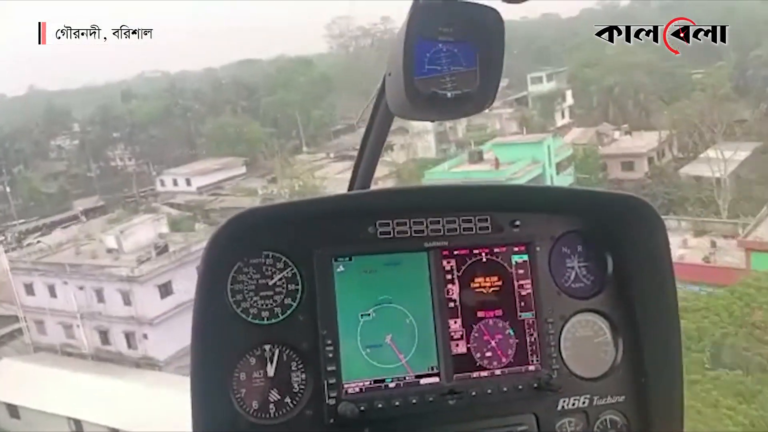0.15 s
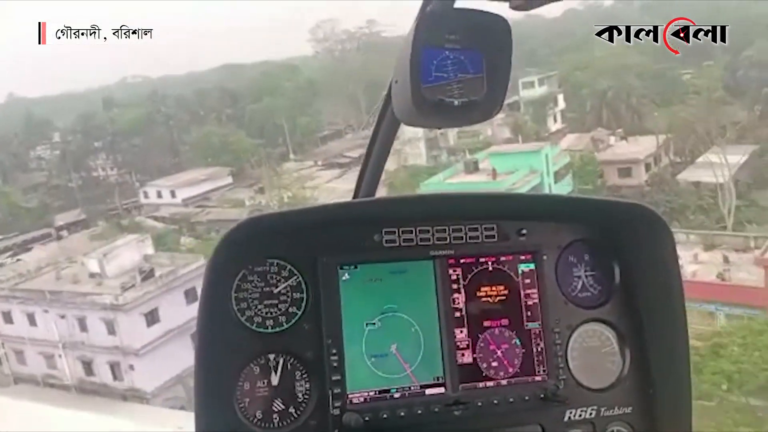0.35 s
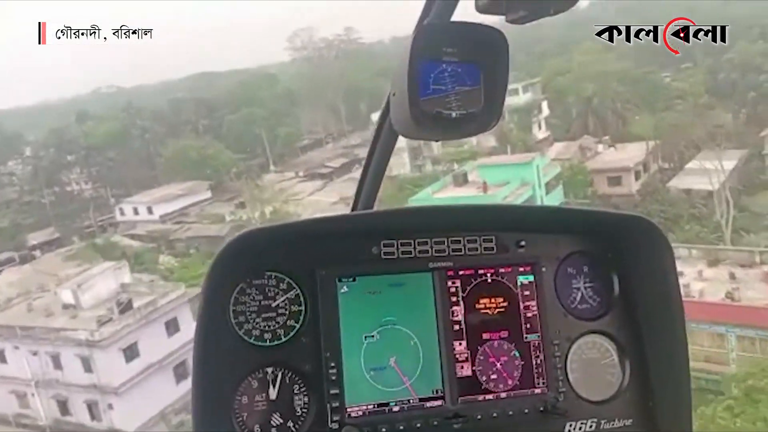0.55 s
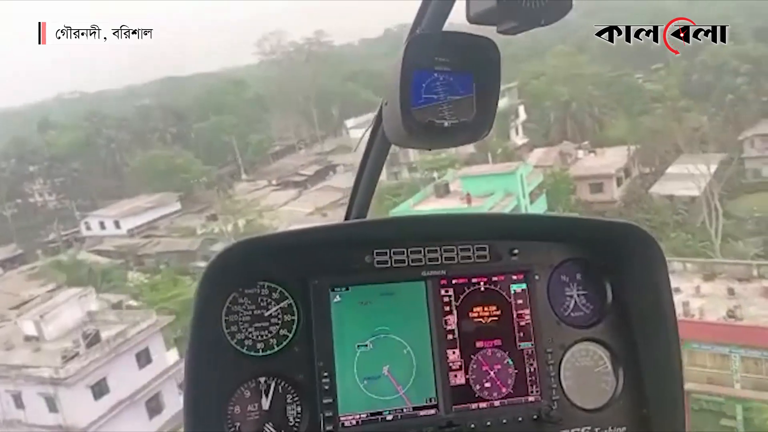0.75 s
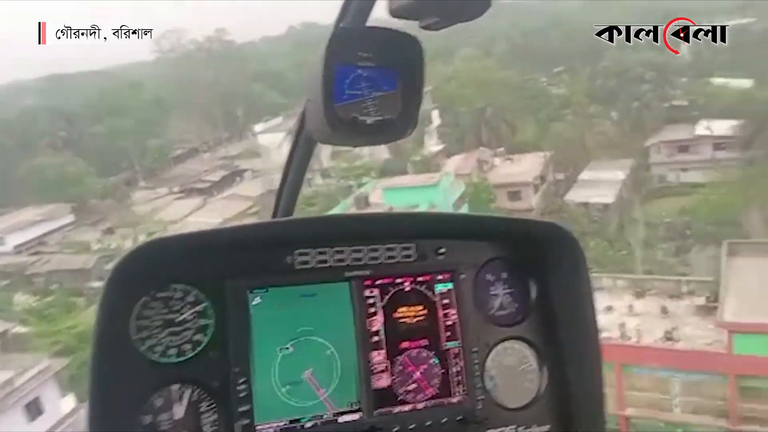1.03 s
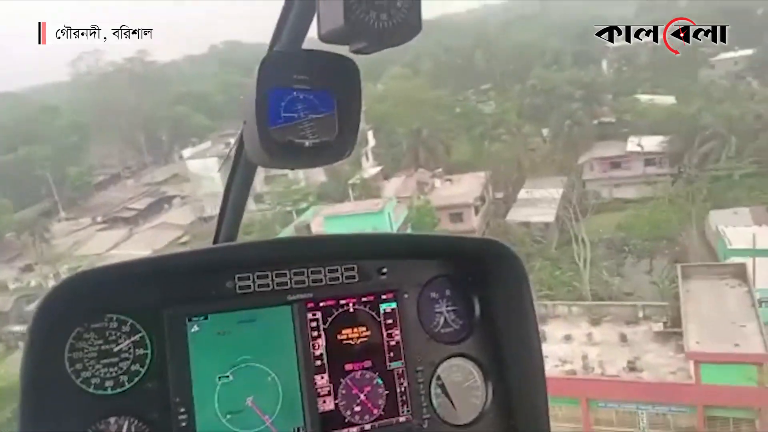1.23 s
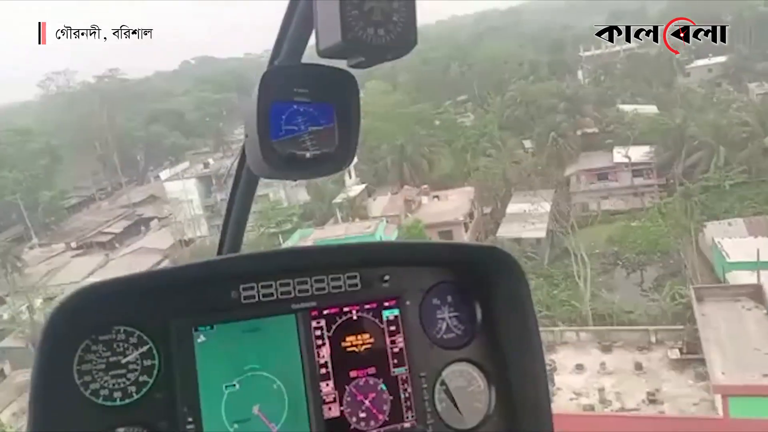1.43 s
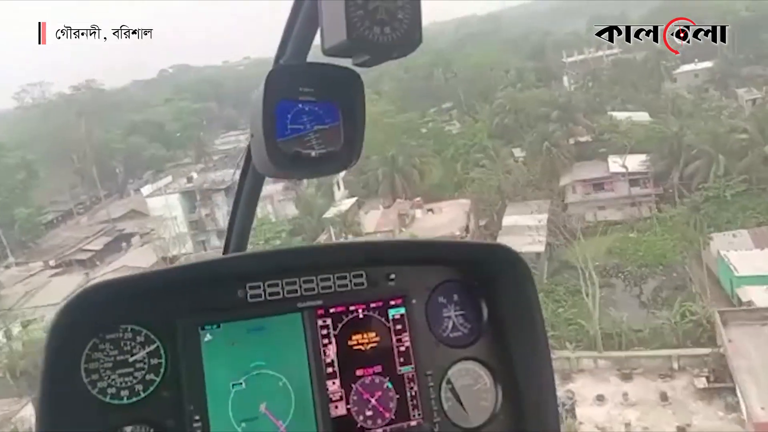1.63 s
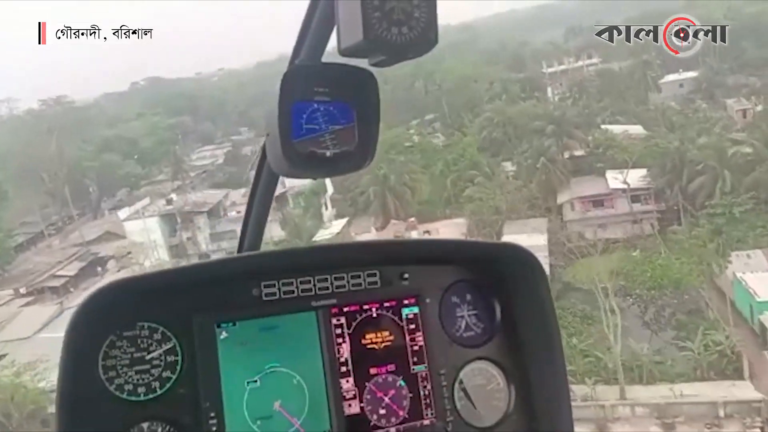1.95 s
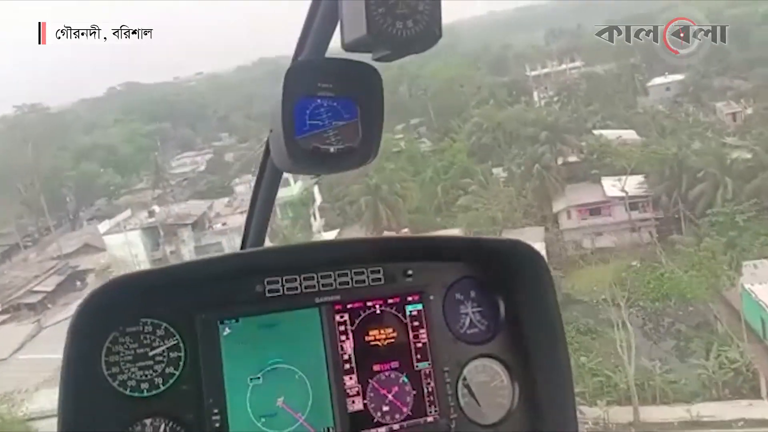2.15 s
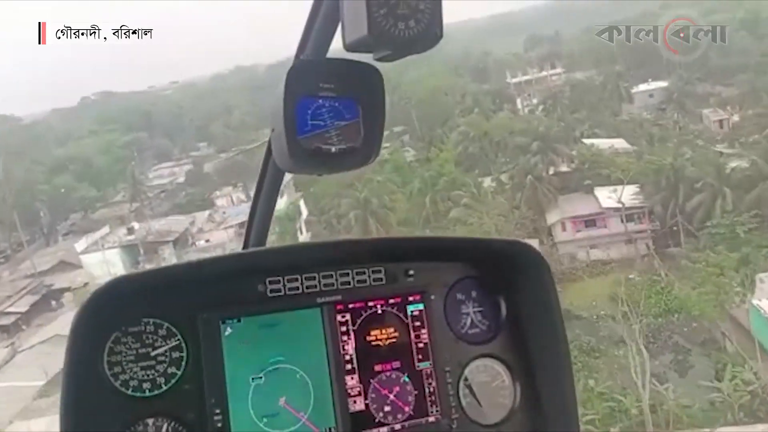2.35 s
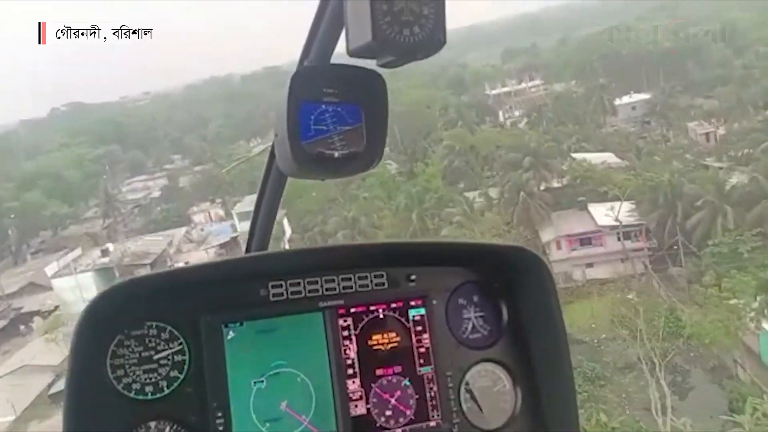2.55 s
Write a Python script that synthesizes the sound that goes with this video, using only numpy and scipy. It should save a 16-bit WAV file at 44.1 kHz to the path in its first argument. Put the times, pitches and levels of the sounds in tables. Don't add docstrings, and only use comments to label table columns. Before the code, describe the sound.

Helicopter cabin in flight: loud low roar, booming bass, fast regular blade thumps, thin high whines

```python
import sys
import numpy as np
from scipy import signal
from scipy.fft import rfft, irfft, next_fast_len
from scipy.io import wavfile
from scipy.ndimage import uniform_filter1d, minimum_filter1d

SR = 44100
rng = np.random.default_rng(int(sys.argv[2]) if len(sys.argv) > 2 else 0)


def ratio_of_db(decibels):
    return 10 ** (np.asarray(decibels, float) / 20)


def put_to_file(sound):
    columns = np.atleast_2d(sound).T
    safe = np.clip(columns, -1, 1)
    whole_steps = np.round(safe * 32767)
    wavfile.write(sys.argv[1], SR, whole_steps.astype(np.int16))


N = 119070
TIME = np.arange(N) / SR
BLADE_HZ = 13.66
BASS_PAN_DB = -1

# (time [s], wind roar level [dB], tail-rotor overtone level [dB])
AIRSPEED = [
    (0, -1.5, 0),
    (.25, 0, 0.5),
    (.5, 0.5, 2.5),
    (1.0, 0, -0.5),
    (1.6, -2, -1),
    (2.1, -1, -5),
    (2.7, -3.5, -16),
]
# (pitch [Hz], left level [dB], right level [dB], phase lead of left [rad])
TAIL_ROTOR = [(161.4, -36, -35, 0), (242, -45, -41.5, .4), (322.8, -47, -46.5, -.6), (403.4, -53, -50, .4),
              (807.3, -55, -47, 2.4), (1615, -69, -58, -.7)]


def walk(rate):
    hold = 16
    steps = np.repeat(rng.standard_normal(int(N / SR * rate) + 2), hold)
    smooth = 1.184 * uniform_filter1d(uniform_filter1d(steps, hold), hold)
    return np.interp(TIME * rate * hold, np.arange(len(smooth)), smooth)


def curve(table, col=1):
    points = np.array(table)
    return np.interp(TIME, points[:, 0], points[:, col])


def shape(table, hz):
    points = np.array(table)
    return np.interp(np.log(hz), np.log(points[:, 0]), points[:, 1])


def tone(row, turns, db=0, wander_db=0.7, flutter_db=0):
    hz, left_db, right_db, lead = row
    jitter = np.cumsum(0.00039 * walk(9.54)) / SR
    phase = 2 * np.pi * (hz * (turns + jitter) + rng.random())
    both = db + wander_db * walk(5.7)
    if flutter_db:
        both = both + flutter_db * walk(16)
    left = ratio_of_db(left_db + both + 0.39 * walk(3.2)) * np.sin(phase + lead)
    right = ratio_of_db(right_db + both) * np.sin(phase)
    return np.sqrt(2) * np.array([left, right])


def rotor_turns():
    # (time [s], speed above nominal [percent])
    speed = [
        (0, 0.1136),
        (.95, .14),
        (1.65, -0.0994),
        (2.05, -0.192),
        (2.7, -0.24),
    ]
    return np.cumsum(1 + curve(speed) / 100) / SR


def roar(beats):
    # (pitch [Hz], width [Hz], level [dB])
    cabin = [(147.5, 38, 7), (204.5, 15, 14), (341.6, 24, 1.5), (406, 45, 3), (484.5, 48, 10.5),
             (560, 32, 0.5), (825, 32, 2)]
    # (pitch [Hz], level [dB per Hz])
    bass = [(12, -76.5), (22, -67), (32, -55.5), (60, -59), (85, -63), (130, -59.5), (230, -61.5),
            (450, -69)]
    left = [(620, -74), (950, -78.5), (1400, -80.5), (2000, -83.5), (3000, -93), (5000, -95), (5800, -104),
            (6700, -122)]
    left_top = [(7600, -112), (9000, -102), (10000, -100), (11200, -108), (12200, -103.5), (12900, -113.5),
                (13400, -122), (15500, -120)]
    right = [(620, -71.5), (950, -76.5), (1350, -73.5), (2000, -83.5), (3200, -95), (4400, -88),
             (5200, -89), (6100, -102)]
    right_top = [(7800, -109), (8800, -115), (9700, -128), (11400, -128), (12200, -114), (13500, -118),
                 (15000, -117), (15600, -125)]
    # (pitch [Hz], likeness of the two ports [0-1])
    alike = [(20, 0.97), (190, 0.98), (320, 0.5), (500, 0.92), (650, 0.4), (1000, 0.1), (2000, 0)]
    # (pitch [Hz], lift [dB])
    swish_lift = [(30, 4), (150, 0.5), (500, 3), (1500, 3.5), (3000, 2.5), (6000, 6), (10000, 7)]
    # (time [s], level [dB])
    buffeting = [
        (0, -8),
        (.8, -7),
        (1.5, -5),
        (2.0, -5.5),
        (2.12, 7),
        (2.32, 7),
        (2.45, -5),
        (2.7, 1),
    ]
    size = next_fast_len(N)
    hz = np.fft.rfftfreq(size, 1 / SR) + 1

    t = np.arange(SR // 8) / SR
    puff = (1 - np.exp(-t / .004)) * np.exp(-t / .019) * 2
    swish = signal.fftconvolve(beats, puff)[:N]

    rings = 1 + sum(ratio_of_db(2 * db) / (1 + ((hz - f) / (w / 2)) ** 4) for f, w, db in cabin)
    left_gain = ratio_of_db(shape(bass + left + left_top, hz) + BASS_PAN_DB * (hz < 520))
    right_gain = ratio_of_db(shape(bass + right + right_top, hz))
    gain = np.array([left_gain, right_gain])

    like = np.clip(shape(alike, hz), 0, 1)
    mid, side = rfft(rng.standard_normal((2, size)))
    air = np.sqrt(1 + like) * mid + np.sqrt(1 - like) * side * np.array([[1], [-1]])
    air = air * gain * np.sqrt(rings * SR / 4)

    swell, buffet, wind = walk(0.65), curve(buffeting), curve(AIRSPEED)
    lowest_hz = 16
    place = 2 * np.log2(hz / lowest_hz)
    out = 0
    for k in range(21):
        mid_hz = lowest_hz * 2 ** (k / 2)
        flicker = 1.5 * walk(8.93) * (mid_hz > 240)
        db = 0.7348 * swell + flicker + shape(swish_lift, mid_hz) * swish
        db = db + buffet / (1 + (mid_hz / 106) ** 4)
        db = db + wind / (1 + (230 / mid_hz) ** 4)
        band = np.clip(1 - abs(place - k), 0, 1)
        out = out + ratio_of_db(db) * irfft(air * band, size)[:, :N]
    return out


def tail_rotor_overtones(turns):
    pitch_db = curve(AIRSPEED, col=2)
    return sum(tone(row, turns, pitch_db) for row in TAIL_ROTOR[1:])


def drive_train(turns):
    # (pitch [Hz], left level [dB], right level [dB], phase lead of left [rad])
    gears = [(552.5, -47, -48, -.1), (587, -53, -55, .2), (771.5, -59, -57, .5), (855, -57, -54, .6),
             (1098, -59, -55, 1.2), (1158, -72, -58, .5), (1227, -69, -54, .4), (1297, -58, -46, -1.8),
             (1367, -62, -54, .5), (1498, -54, -59, -2.3), (1690, -63, -59, -1.5), (1733, -61, -58, 2.4),
             (1993, -63, -66, -.2), (2331, -72, -77, 1.1)]
    return sum(tone(row, turns) for row in gears)


def turbine(turns):
    # (pitch [Hz], left level [dB], right level [dB], phase lead of left [rad])
    wheels = [(2595, -60, -63, .2), (2762, -75, -76, 1.4), (2998, -76, -82, 1), (3316, -73, -79, 2.6),
              (3467, -77, -82, 1), (3833, -76, -72, -1.2), (3905, -78, -73, -1), (4156, -84, -71, -1.5),
              (4791, -86, -74, .6), (5190, -82, -68, -.7), (5518, -80, -69, .8), (8296, -89, -93, 1.8),
              (9399, -82, -110, 0), (13781, -91, -84, 1.2)]
    return sum(tone(row, turns) for row in wheels)


def whines(turns):
    # (pitch [Hz], left level [dB], right level [dB], phase lead of left [rad])
    pitches = [(3867, -65.5, -58.5, -1.1), (4416, -65, -52, -1.7), (4990, -62.5, -50.5, 1.5),
               (12115, -75, -89, .3)]
    # (time [s], low whine level [dB], middle level [dB], high level [dB], top level [dB])
    standing_waves = [(0, 5, 1, 7, -4), (.15, 4, 3, 6.5, -4), (.33, 5, 6, 7, -3), (.55, 5, 3, 6, -4),
                      (.68, 5, -5, 6, -5), (.76, 5, -20, 5, -4), (.83, 6, -17, 4, -3), (.91, 5, -3, 2, -2),
                      (.98, 3, 2, -13, -2), (1.1, 1, 2, -3, 0), (1.35, 0, 1, -6, 3), (1.6, 0, 2, -9, 2),
                      (1.8, 1, 2, -11, 2), (2.0, 2, 4, -11, 1), (2.2, 1, 3, -10, -1), (2.38, 1, 3, -16, -4),
                      (2.5, 1, 0, -7, -5), (2.7, 2, 1, -8, -6)]
    out = 0
    for k, row in enumerate(pitches):
        out = out + tone(row, turns, curve(standing_waves, col=k + 1), wander_db=0.92, flutter_db=1.0)
    return out


def booms(turns):
    # (time [s], peak level [dB], pitch [Hz])
    puffs = [(0.019, -19.5, 177), (0.042, -24.5, 165), (0.076, -17.0, 174.5), (0.123, -18, 171.5),
             (0.219, -22, 173.3), (0.247, -24, 160), (0.301, -17, 178), (0.326, -18, 175.4),
             (0.394, -19, 179), (0.435, -20.5, 164), (0.461, -17.5, 171.4), (0.537, -19, 179),
             (0.583, -20, 179), (0.633, -17.5, 178), (0.655, -19, 191), (0.679, -17, 175),
             (0.715, -20, 171), (0.763, -15, 164.7), (0.849, -22.5, 194.3), (0.874, -22.5, 175),
             (0.896, -29, 193), (0.928, -21.5, 166), (0.952, -19, 171), (0.979, -21, 167),
             (1.032, -21.0, 179), (1.07, -14, 167), (1.099, -17.5, 166), (1.144, -17.5, 166),
             (1.214, -21.0, 193), (1.286, -16.0, 170.2), (1.334, -16.5, 173), (1.359, -23, 185),
             (1.381, -22, 164), (1.406, -17, 166), (1.433, -17, 171.6), (1.487, -18, 169),
             (1.535, -28, 154), (1.58, -17.5, 168.6), (1.625, -18.5, 173), (1.648, -15.5, 173),
             (1.814, -17.5, 167.3), (1.86, -16, 167.5), (1.933, -19, 155), (1.974, -19, 164),
             (2.039, -15, 180.2), (2.066, -14.5, 168.3), (2.162, -24, 161), (2.19, -14.5, 155),
             (2.234, -17, 157), (2.319, -17.5, 170.4), (2.381, -22, 176), (2.403, -20.5, 175),
             (2.425, -20.5, 174), (2.476, -15.5, 160), (2.518, -17.5, 175.6), (2.546, -19, 175),
             (2.582, -16.5, 164), (2.622, -27, 166), (2.662, -21, 169), (2.693, -26.5, 165)]
    hum_hz = TAIL_ROTOR[0][0]
    out = ratio_of_db(-32) * np.sin(2 * np.pi * hum_hz * turns)
    at = np.array(puffs)[:, 0]
    gaps = np.minimum(np.diff(at, prepend=-1, append=9), .1)
    slip = 0.51 * rng.standard_normal(len(at))
    for k, (s, db, hz) in enumerate(puffs):
        before, after = gaps[k], gaps[k + 1]
        near = slice(max(int((s - before) * SR) + 1, 0), int((s + after) * SR))
        lag = TIME[near] - s
        span = np.where(lag < 0, before, after)
        swell = abs(np.cos(np.pi / 2 * lag / span)) ** 3.6
        start = 2 * np.pi * hum_hz * turns[min(int(s * SR), N - 1)] + slip[k]
        out[near] += ratio_of_db(db) * swell * np.sin(2 * np.pi * hz * lag + start)
    pan_db = -0.9
    return ratio_of_db(-2.73) * out * ratio_of_db(np.array([[pan_db / 2], [-pan_db / 2]]))


def blades():
    # (time [s], blade load [dB])
    load = [
        (0, -11),
        (.8, -9),
        (1.0, -7),
        (1.5, -6),
        (1.85, -6),
        (2.05, -2),
        (2.3, 1),
        (2.45, -1),
        (2.7, 0),
    ]
    # (time [s], extra level [dB])
    slaps = [(.17, 3), (.32, 5), (.69, 3), (.9, 5), (.99, 3), (1.13, 2), (1.21, 4), (1.36, 2), (1.5, 2),
             (1.94, 5), (2.01, 4), (2.09, -5), (2.16, 0), (2.31, 0), (2.38, 3), (2.45, -1), (2.53, 4),
             (2.6, -2), (2.67, 4)]
    k = np.arange(int(N / SR * BLADE_HZ) + 1)
    at = ((.035 + k / BLADE_HZ) * SR).astype(int)
    db = curve(load)[at] + 1.0 * rng.standard_normal(len(k))
    for s, extra_db in slaps:
        db[np.argmin(abs(at - s * SR))] += extra_db
    beats = np.zeros(N)
    beats[at] = ratio_of_db(db)
    return beats


def thump(beats):
    shell_hz, width_hz = 33, 28
    hz = np.fft.rfftfreq(N, 1 / SR) + 1e-3
    resonance = 1 / (1 + 1j * (hz - shell_hz ** 2 / hz) / width_hz) ** 2
    ring = irfft(rfft(beats ** .7) * resonance, N)
    ring = ring * SR / np.sqrt(BLADE_HZ * width_hz)
    return ratio_of_db(-43.5) * ring * ratio_of_db(np.array([[BASS_PAN_DB], [0]]))


def scene():
    turns = rotor_turns()
    beats = blades()
    rotors = booms(turns) + thump(beats) + tail_rotor_overtones(turns)
    machinery = drive_train(turns) + turbine(turns) + whines(turns)
    return roar(beats) + rotors + machinery


def top_cut(x):
    return signal.sosfilt(signal.butter(12, 15430, fs=SR, output="sos"), x)


def record(dry):
    k = int(.012 * SR)
    limit_db, ratio = -17, 3
    bass = signal.sosfiltfilt(signal.butter(2, 260, fs=SR, output="sos"), dry)
    peak = -minimum_filter1d(-abs(bass).max(axis=0), k)
    over = np.minimum(ratio_of_db(limit_db) / peak, 1)
    gain = uniform_filter1d(over ** (1 - 1 / ratio), k)
    held = dry - bass * (1 - gain)
    held = held * np.minimum(TIME / .001, 1)
    return top_cut(held)


dry = scene()
out = record(dry)
put_to_file(out)
```